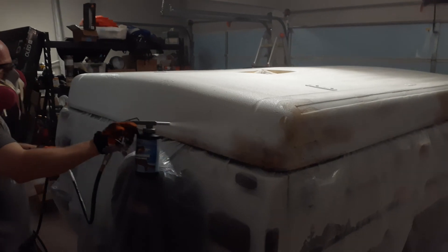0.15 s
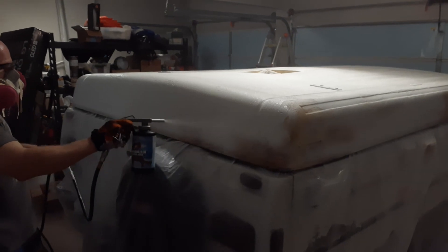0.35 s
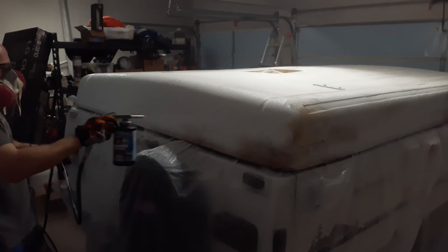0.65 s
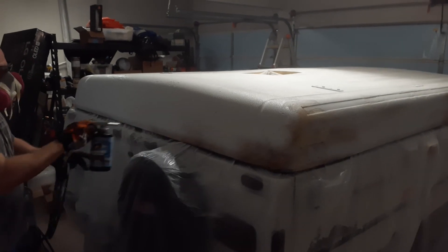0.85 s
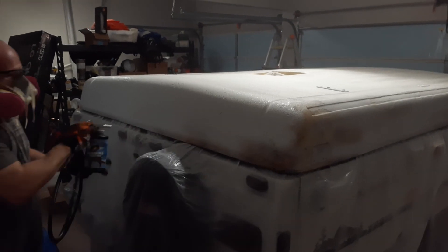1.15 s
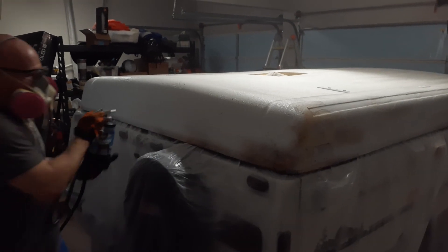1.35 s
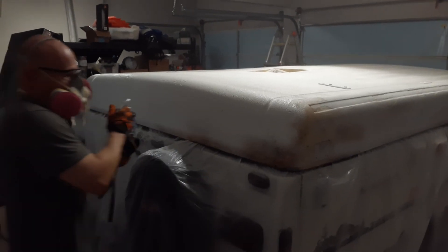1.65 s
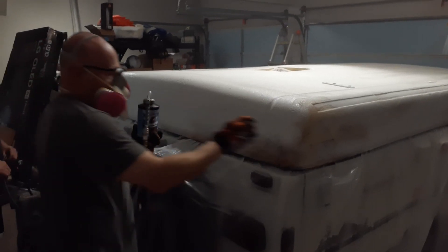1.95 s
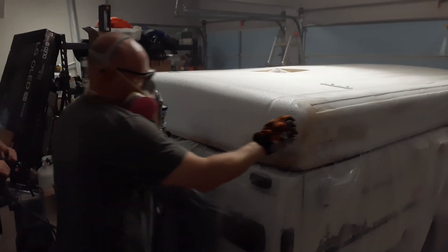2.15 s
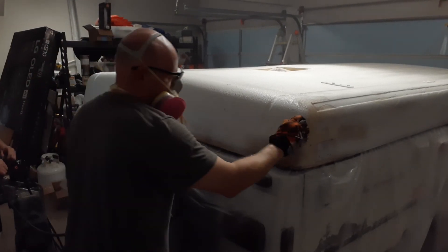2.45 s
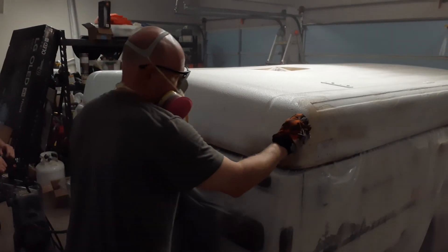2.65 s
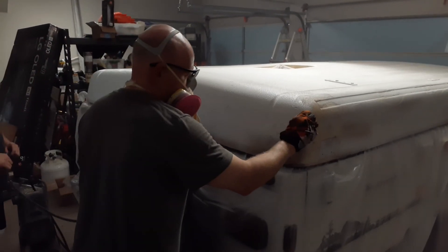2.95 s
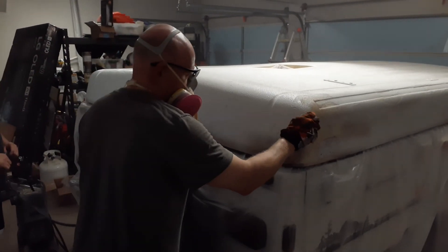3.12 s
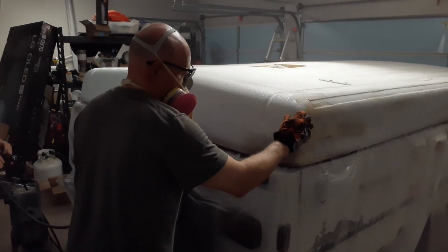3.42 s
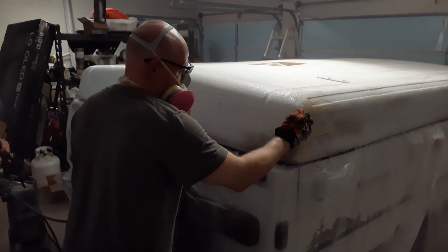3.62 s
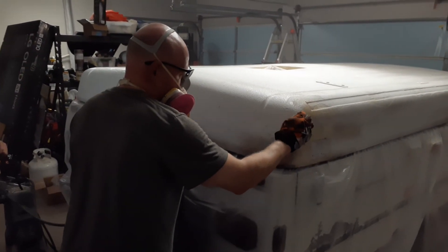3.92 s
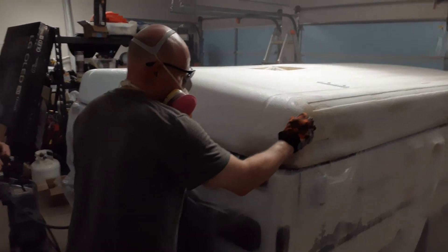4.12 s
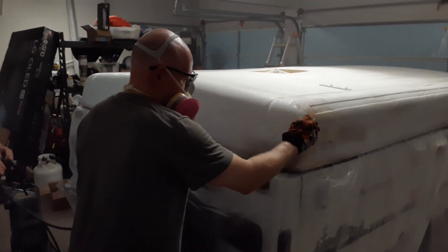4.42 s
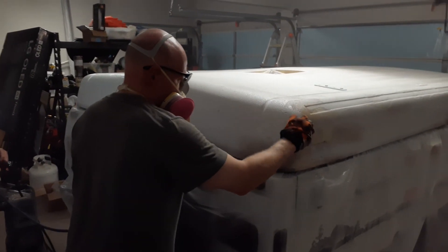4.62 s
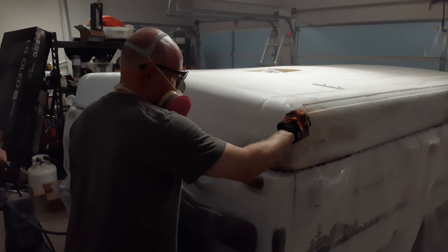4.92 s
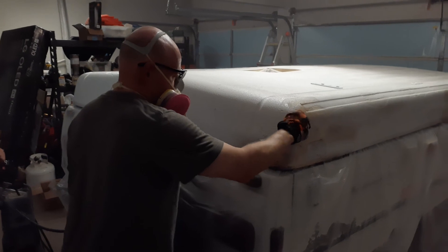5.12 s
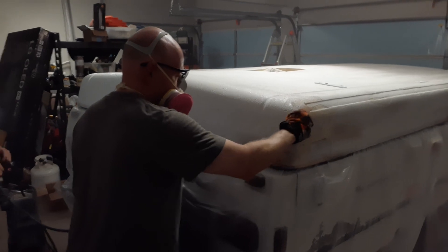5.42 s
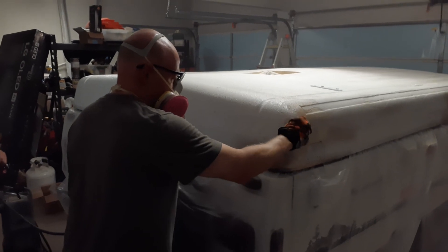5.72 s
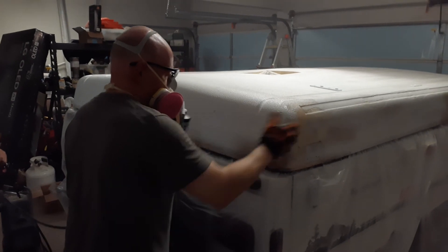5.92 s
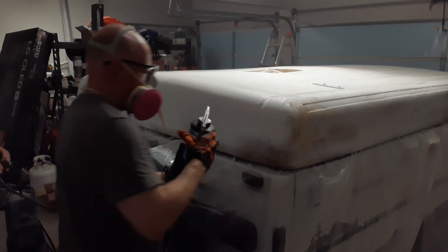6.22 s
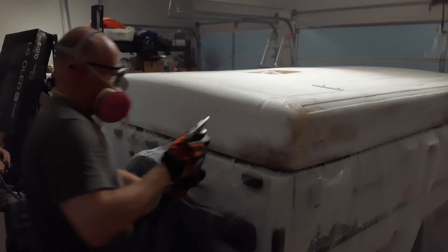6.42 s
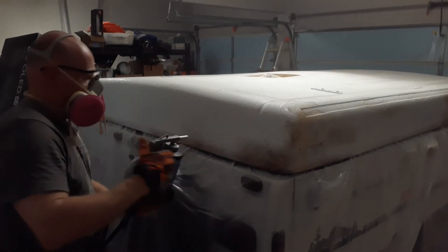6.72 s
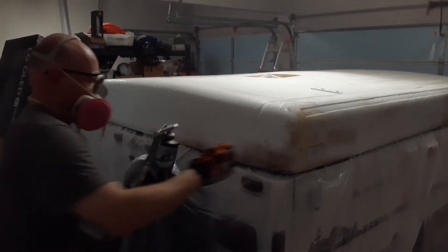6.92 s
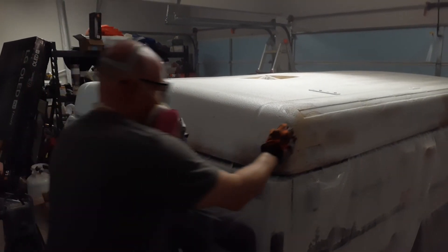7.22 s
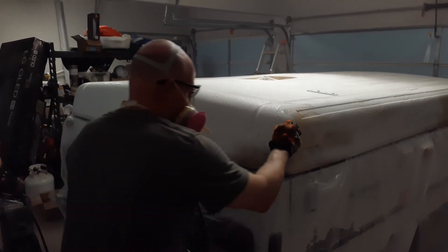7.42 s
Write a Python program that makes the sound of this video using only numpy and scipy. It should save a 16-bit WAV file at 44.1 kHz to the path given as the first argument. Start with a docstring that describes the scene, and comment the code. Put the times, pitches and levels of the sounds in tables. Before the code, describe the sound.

A bright spray gun hiss with rumbling wind buffets cuts off after under a second, leaving a steady compressor drone swelling up in a garage.

```python
"""Spray gun and compressor in a garage

A piston compressor drones throughout: sines locked to its crank, looped valve clatter, hum and air noise.
A spray gun blows bright, coloured noise, then is let go and dies away in the garage.
Its jet also buffets the left microphone port, with lumpy low noise and single slaps.
The recorder turns down for loud sound, holds for about a second, then lets the compressor swell back up."""
import sys
import numpy as np
from scipy import signal
from scipy.fft import rfft, irfft
from scipy.io import wavfile
from scipy.ndimage import uniform_filter1d, minimum_filter1d

SR = 44100
rng = np.random.default_rng(int(sys.argv[2]) if len(sys.argv) > 2 else 0)


def dump(signal):
    """Clip the signal to [-1, 1] and save it as 16-bit WAV at the path in sys.argv[1]."""
    limited = np.clip(np.atleast_2d(signal).T, -1, 1)
    pcm = np.round(limited * 32767).astype(np.int16)
    wavfile.write(sys.argv[1], SR, pcm)


N = 333690

# Strong crank tones in the garage, before the painter's body alters them:
# (multiple of crank rate, left level [dB], right level [dB], left phase lead [rad])
CRANK_TONES = [(1, -56.0, -56.4, 0.0), (2, -43.1, -48.1, 0.0), (3, -46.6, -46.0, -0.5),
               (4, -46.3, -49.5, 0.2), (5, -29.9, -36.3, 0.4), (6, -19.7, -22.3, -0.1),
               (7, -25.7, -33.7, 0.6), (8, -30.8, -36.1, -1.0), (9, -38.0, -25.3, -1.0),
               (10, -37.6, -37.7, 1.0), (11, -35.8, -36.8, -0.7), (12, -31.7, -33.8, -0.5),
               (13, -36.0, -29.7, -1.0), (14, -17.5, -22.0, 0.8), (15, -27.6, -33.0, 2.3),
               (16, -29.4, -27.0, -2.3), (17, -33.6, -38.3, -2.6), (18, -44.1, -39.3, 0.7),
               (19, -43.1, -46.1, 2.5), (20, -46.6, -52.5, 2.0), (21, -43.3, -51.8, 1.3),
               (22, -34.3, -40.5, -2.9), (23, -41.6, -37.1, 3.1), (24, -48.8, -42.3, -0.7),
               (25, -44.5, -46.8, 0.0), (26, -36.9, -48.7, -1.6), (27, -46.0, -43.5, -0.3),
               (28, -32.8, -38.2, -2.9), (29, -50.4, -53.2, -2.8), (30, -40.3, -42.2, 2.8),
               (31, -46.8, -43.1, 3.1), (33, -49.5, -44.2, -2.3), (34, -45.5, -56.8, -0.9),
               (37, -48.7, -43.7, 2.9), (38, -37.3, -37.5, 2.7), (39, -50.7, -43.1, 1.0),
               (40, -42.6, -48.3, -0.9), (50, -53.1, -37.8, 1.3)]
# Valve and air noise of the pump, before pulsing and resonances:
# (frequency [Hz], left level [dB per Hz], right level [dB per Hz])
PUMP_NOISE = [(40, -76, -85), (131, -78, -78), (220, -68, -72), (340, -57.5, -67), (610, -60, -61.5),
              (1050, -61, -67), (1420, -66, -66.5), (1650, -66, -68.5), (2550, -67, -63.5),
              (3180, -70, -69.5), (6400, -71, -68), (7250, -74.5, -78.5), (8400, -67, -100),
              (9400, -68.5, -81.5), (11870, -67.5, -66.5), (15300, -77.5, -76)]
# Valve clatter repeating every turn: (frequency [Hz], one crank multiple over the pump noise per Hz [dB])
VALVE_CLATTER = [(1500, 16), (3000, 12.5), (6000, 9.5), (11300, 11), (11650, 5.5), (12000, 10.5),
                 (15500, 11)]
# How alike the pump's air noise is in both ports: (frequency [Hz], likeness [1 same, 0 unrelated, -1 opposite])
PORT_LIKENESS = [(60, 0.78), (300, 0.13), (800, 0.22), (1300, -0.45), (3000, -0.00049), (15000, -0.023)]
# Steady motor hum: (frequency [Hz], left level [dB], right level [dB])
MOTOR_HUM = [(120, -62, -64), (241, -57, -55), (375, -59, -63), (479.6, -48, -47.5), (605.3, -45, -45.5)]
# Casing and cowl resonances colouring the pump noise:
# (frequency [Hz], width [Hz], middle level over the pump noise, before wavering [dB])
CASING_RESONANCES = [(1353, 220, -4.5), (2020, 67, -10), (2577, 45, -8), (3755, 82, -4.5), (5260, 120, -9),
                     (6190, 170, -10), (11700, 99, -8), (14800, 140, -4)]
# The painter's body shades and reflects the drone: (multiple of crank rate,
# left change when away [dB], right change when away [dB],
# left change when leaning [dB], right change when leaning [dB])
BODY_SHADING = [(3, 2, 1, 3, 2), (6, -1, -1, -1, -1), (7, 0, 3, -3, -6), (8, -2, -1, -6, -3),
                (9, 3, 0, -2, 1), (11, -2, -1, -5, 1), (12, 4, 4, -5, -13), (13, 3, -4, 1, -4),
                (14, -2, -1, -1, -3), (15, 2, 5, 1, 6), (16, -6, 2, -3, -4), (17, -2, 0, -3, -4),
                (18, 3, 2, -13, -4), (22, -6, 3, -6, 4), (26, 0, 13, 4, 15), (27, 10, 1, 6, 4),
                (28, -6, -1, -3, -2), (38, -8, -12, -11, -13), (50, 10, -9, 9, -4)]
# Where the painter stands:
# (time [s], place [1 away from the panel, 0 working on it, -1 leaning round its corner])
PAINTER_PLACE = [(0, .8), (1.5, 1), (2.1, 0.53), (3.6, -0.052), (4.5, -0.2), (5.8, -0.092), (6.75, 0.71),
                 (7.1, -.8), (7.57, -1)]
# Wind noise at the left port, before wind strength and lumps: (frequency [Hz], level [dB per Hz])
WIND_NOISE = [(20, -52), (45, -36), (90, -27.5), (170, -31), (300, -37), (500, -33), (1000, -36),
              (2000, -37.5), (6000, -66)]
# Gusts as the jet sweeps across the port: (time [s], level over the wind [dB])
WIND_GUSTS = [(.09, 2), (.32, 5), (.5, 5)]
# Single eddies slapping the left port: (time [s], peak level before the recorder [dB])
EDDY_SLAPS = [(.064, -5), (.11, 1), (.186, 3), (.219, -1), (.298, 1), (.339, -1), (.395, 1), (.42, 4),
              (.467, 2), (.5, 2), (.549, 5), (.588, -5), (.674, -2)]
# Spray jet at each port, before flow and reflection:
# (frequency [Hz], left level [dB per Hz], right level [dB per Hz])
JET_NOISE = [(400, -48, -60), (900, -47, -54), (1500, -46.5, -60), (2200, -45, -49), (3200, -47.5, -49.5),
             (4500, -44.5, -45.5), (6200, -43, -42), (7200, -46, -50.5), (8300, -38.5, -61),
             (9600, -36, -55), (11500, -35.5, -39), (13500, -39.5, -38), (15500, -38, -41)]

CRANK_HZ = 51.92  # crank turns per second
STAGGER_TURNS = 0.1468  # times the multiple squared: keeps the crank tones from lining up
# One swell of rough noise
SWELL_S, SWELL_HALF_S = 6.82, 0.3
SWELL_HZ, SWELL_WIDTH_HZ, SWELL_DB = 1850, 280, -1  # dB relative to the pump noise
# Trigger held, let go, valve closes, then the garage carries the rest
FLOW_DB, LET_GO_S, CLOSING_S, CLOSING_LOSS_DB = -0.6, 0.61, 0.08, 8
GARAGE_T60_S = 0.51  # time for a 60 dB fall
# Wind swings onto the left port and dies once the trigger is let go
WIND_DB, WIND_RISE_S, WIND_RISE_DB = -11, 0.058, 6
GUST_HALF_S, WIND_FALL_DB_PER_S2 = 0.05, 2600
# Recorder
CEILING_DB, RIDE_RANGE_DB, HOLD_S, RELEASE_DB_PER_S = -14, 11, 1.12, 14.5
CUTOFF_HZ = 15740


def from_db(db):
    """Turns decibels into a plain multiplier."""
    return 10 ** (np.asarray(db) / 20)


def in_time(rows):
    """Reads each column of a time table at every sample, in straight lines between points."""
    s, *columns = np.transpose(rows)
    return [np.interp(np.arange(N) / SR, s, column) for column in columns]


def at_hz(rows, hz):
    """Reads each column of a spectrum table on a log-frequency axis."""
    points, *columns = np.transpose(rows)
    log_hz = np.log(np.maximum(hz, 1))
    return np.array([np.interp(log_hz, np.log(points), column) for column in columns])


def drift(rate):
    """Random wandering of spread 1: smoothed noise drawn at every 64th sample, faster for a higher rate."""
    r = np.exp(-128 * np.pi * rate / SR)
    noise = rng.standard_normal(N // 64 + 3002)
    slow = signal.lfilter([1], [1, -2 * r, r * r], noise)[3000:]  # drop the filter's start-up
    slow = (slow - slow.mean()) / slow.std()
    return np.interp(np.arange(N) / 64, np.arange(len(slow)), slow)


def coloured(white, db_per_hz):
    """Shapes white sound of spread 1 to a spectrum in dB per Hz."""
    hz = np.arange(N // 2 + 1) * SR / N
    return irfft(rfft(white) * from_db(at_hz(db_per_hz, hz)) * np.sqrt(SR / 2), N)


def resonate(x, hz, width_hz):
    """Rings around one frequency, like a casing panel: a two-pole resonance with gain 1 at its top."""
    r = np.exp(-np.pi * width_hz / SR)
    feedforward = np.array([1, 0, -1]) * (1 - r * r) / 2
    feedback = [1, -2 * r * np.cos(2 * np.pi * hz / SR), r * r]
    return signal.lfilter(feedforward, feedback, x)


def stereo_noise():
    """White noise for two ports, mixing a shared and an opposite part to set their likeness."""
    hz = np.arange(N // 2 + 1) * SR / N
    alike = np.clip(at_hz(PORT_LIKENESS, hz)[0], -1, 1)
    mid, side = rfft(rng.standard_normal((2, N)))
    shared = np.sqrt((1 + alike) / 2) * mid
    opposite = np.sqrt((1 - alike) / 2) * side * [[1], [-1]]
    return irfft(shared + opposite, N)


def hum():
    """The motor hums in steady sine tones, each with a random starting phase."""
    t = np.arange(N) / SR
    out = np.zeros((2, N))
    for hz, left_db, right_db in MOTOR_HUM:
        tone = np.sin(2 * np.pi * (hz * t + rng.random()))
        out += np.sqrt(2) * from_db([[left_db], [right_db]]) * tone
    return out


def clatter(turns, change_rate):
    """Valve contacts repeat every turn: one looped pattern stays while two others come and go."""
    size = 8192  # points in one turn
    multiples = np.arange(size // 2 + 1)
    hz = multiples * CRANK_HZ
    level = from_db(at_hz(PUMP_NOISE, hz) + at_hz(VALVE_CLATTER, hz))
    level = level * (hz < CUTOFF_HZ) * (multiples > 30)
    level[:, [round(row[0]) for row in CRANK_TONES]] = 0  # the drone plays these
    out = np.zeros((2, N))
    position = turns % 1 * size
    for weight in (np.ones(N), 0.5 * drift(change_rate), 0.5 * drift(change_rate)):
        lines = level * (rng.standard_normal(level.shape) + 1j * rng.standard_normal(level.shape))
        one_turn = irfft(lines, size) * size / 2
        looped = [np.interp(position, np.arange(size), port, period=size) for port in one_turn]
        out += weight * np.array(looped)
    return out


def drone(turns, waver_db, waver_turns, stagger_turns):
    """Each crank tone is a sine on the crank angle; higher ones waver more as the sound paths change."""
    place = in_time(PAINTER_PLACE)[0]
    stance = np.clip([place, -place], 0, 1)  # how far away, how far leaning
    shade_db = {round(row[0]): np.reshape(row[1:], (2, 2)).T @ stance for row in BODY_SHADING}
    out = np.zeros((2, N))
    for multiple, left_db, right_db, lead in CRANK_TONES:
        order = round(multiple)
        stagger = stagger_turns * order ** 2  # smears the stroke so it is not one sharp pulse
        path_waver = waver_turns * order ** 2 * drift(2.1)
        angle = 2 * np.pi * (order * turns - stagger + path_waver)
        level_db = np.array([[left_db], [right_db]]) + shade_db.get(order, 0)
        level_waver_db = waver_db * order * np.array([drift(1.3), drift(1.8)])
        out += np.sqrt(2) * from_db(level_db + level_waver_db) * np.sin(angle + [[lead], [0]])
    return out


def compressor():
    """Pump air noise pulses gently with the crank and rings the casing; drone, clatter and hum join it."""
    t = np.arange(N) / SR
    turns = CRANK_HZ * t
    # One pulse and four smaller pulses per turn, plus random wavering
    stroke_db = 0.4 * np.cos(2 * np.pi * turns) + 0.33 * np.cos(8 * np.pi * turns) + 0.43 * drift(10)
    noise = coloured(stereo_noise() * from_db(stroke_db), PUMP_NOISE) + clatter(turns, change_rate=0.73)
    pump = noise.copy()
    for hz, width_hz, db in CASING_RESONANCES:
        pump += from_db(db + 3.0 * drift(2.5)) * resonate(noise, hz, width_hz)
    swell = np.maximum(1 - abs(t - SWELL_S) / SWELL_HALF_S, 0)
    rough_band = resonate(pump, SWELL_HZ, SWELL_WIDTH_HZ)
    pump = pump + swell * from_db(SWELL_DB) * rough_band
    tones = drone(turns, waver_db=0.0436, waver_turns=0.00004, stagger_turns=STAGGER_TURNS)
    return tones + hum() + pump


def slaps(slap_hz):
    """Each slap is one short, heavily damped swing of the diaphragm, a push or a pull."""
    s, peak_db = np.transpose(EDDY_SLAPS)
    clicks = np.zeros(N)
    clicks[np.round(s * SR).astype(int)] = from_db(peak_db) * rng.choice([-1, 1], len(s))
    t = np.arange(-200, 400) / SR
    spread_s = np.where(t < 0, 0.0005, 0.0015)  # quick rise, slower fall
    swing = np.cos(2 * np.pi * slap_hz * t) * np.exp(-(t / spread_s) ** 2)
    return signal.fftconvolve(clicks, swing)[200:N + 200]  # centre each swing on its click


def buffet(lumpy_db, right_db):
    """Eddies in the jet thump on the left port in lumps and slaps; little reaches the right."""
    t = np.arange(N) / SR
    rise_db = -WIND_RISE_DB * np.maximum(1 - t / WIND_RISE_S, 0)
    gust_db = sum(db * np.exp(-((t - s) / GUST_HALF_S) ** 2) for s, db in WIND_GUSTS)
    fall_db = np.minimum(WIND_FALL_DB_PER_S2 * np.maximum(t - LET_GO_S, 0) ** 2, 200)
    wind_db = WIND_DB + rise_db + gust_db - fall_db
    lumps = from_db(lumpy_db * (0.24 * drift(30) + drift(150)))
    thumps = coloured(rng.standard_normal(N) * lumps * from_db(wind_db), WIND_NOISE)[0]
    return (thumps + slaps(slap_hz=297)) * from_db([[0], [right_db]])


def spray():
    """Jet noise is combed by a near reflection that drifts as the gun moves; the garage lets it die away."""
    t = np.arange(N) / SR
    closing_db = CLOSING_LOSS_DB * np.clip((t - LET_GO_S) / CLOSING_S, 0, 1)
    garage_decay_db = 60 * np.maximum(t - LET_GO_S - CLOSING_S, 0) / GARAGE_T60_S
    flow_db = FLOW_DB + 0.76 * drift(22) - closing_db - garage_decay_db
    jet = rng.standard_normal((2, N)) * from_db(flow_db)
    lag_s = 0.0011 - 0.00028 * np.minimum(t, 1)  # shortens during the first second
    echo = np.array([np.interp(t - lag_s, t, port) for port in jet])
    return coloured(jet + from_db(-20) * echo, JET_NOISE)


def scene():
    """Adds the compressor, the jet's wind on the microphone and the spray itself."""
    return compressor() + buffet(lumpy_db=4.0, right_db=-37) + spray()


def record(dry):
    """A slow gain rider with hold, a quick limiter for what it cannot catch, then bass and top cuts."""
    t = np.arange(N) / SR
    power = uniform_filter1d(np.mean(dry ** 2, axis=0), round(0.04 * SR))
    level_db = 10 * np.log10(power + 1e-12)
    over_db = np.maximum(level_db - CEILING_DB, 0)
    hold = round(HOLD_S * SR)
    # Keep the largest cut of the last HOLD_S seconds
    wanted_db = np.minimum(over_db, RIDE_RANGE_DB)
    held_db = -minimum_filter1d(-wanted_db, hold, origin=(hold - 1) // 2, mode="nearest")
    # Let the cut shrink no faster than the release rate
    release_db = RELEASE_DB_PER_S * t
    ride_db = np.maximum.accumulate(held_db + release_db) - release_db
    ride_db = uniform_filter1d(ride_db, round(0.25 * SR), mode="nearest")
    limit_db = uniform_filter1d(np.maximum(over_db - ride_db, 0), round(0.037 * SR), mode="nearest")
    # The microphone capsule loses the deep bass
    bass_cut = signal.butter(2, 38, "high", fs=SR, output="sos")
    top_cut = signal.ellip(14, 0.3, 70, CUTOFF_HZ, fs=SR, output="sos")
    levelled = signal.sosfilt(bass_cut, dry) * from_db(-ride_db - limit_db)
    return signal.sosfilt(top_cut, levelled)


dry = scene()
out = record(dry)
dump(out)
```